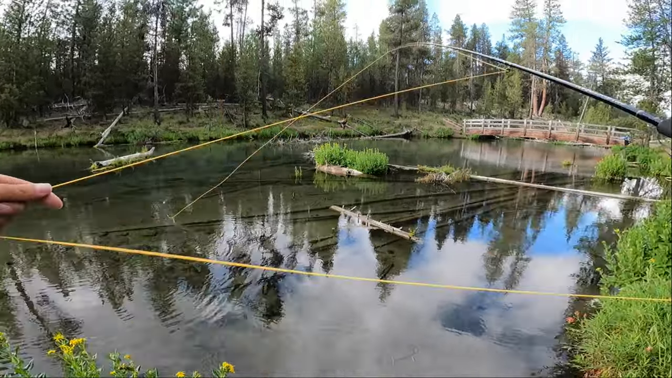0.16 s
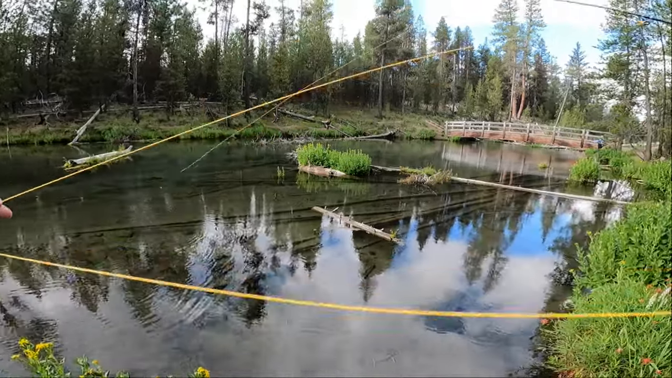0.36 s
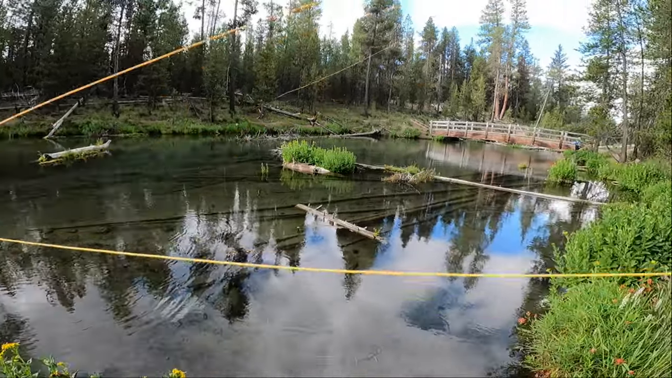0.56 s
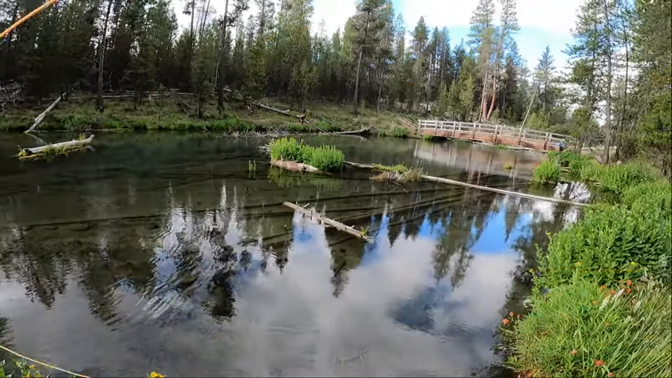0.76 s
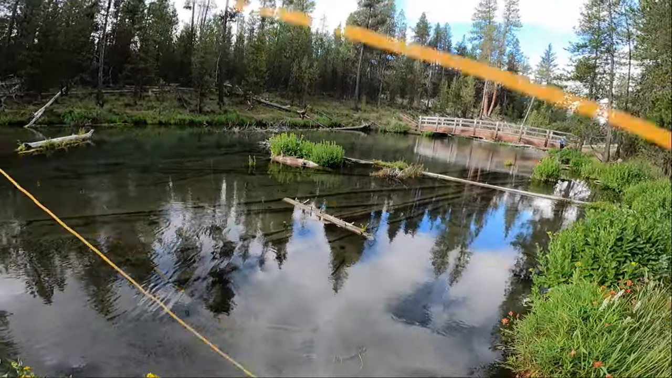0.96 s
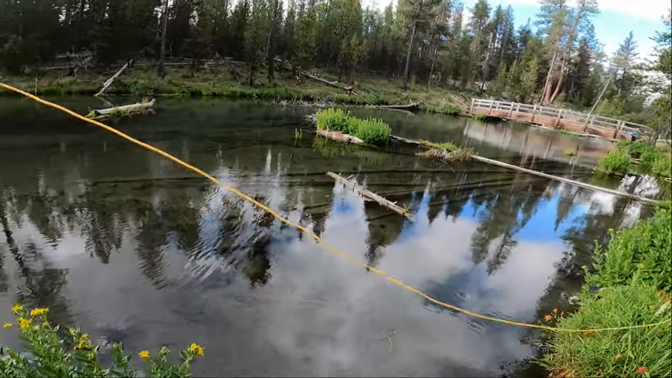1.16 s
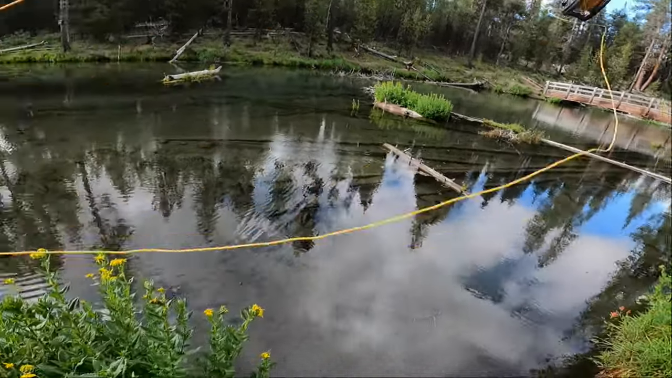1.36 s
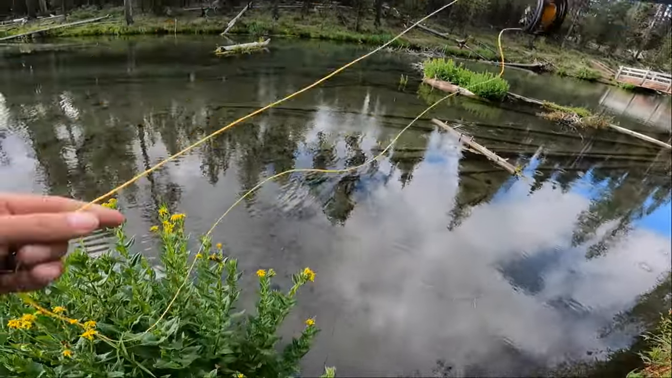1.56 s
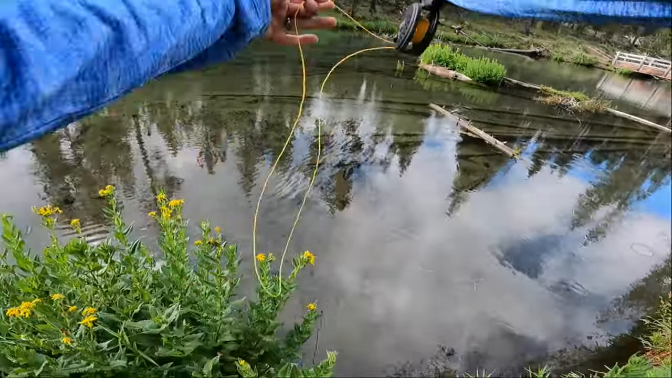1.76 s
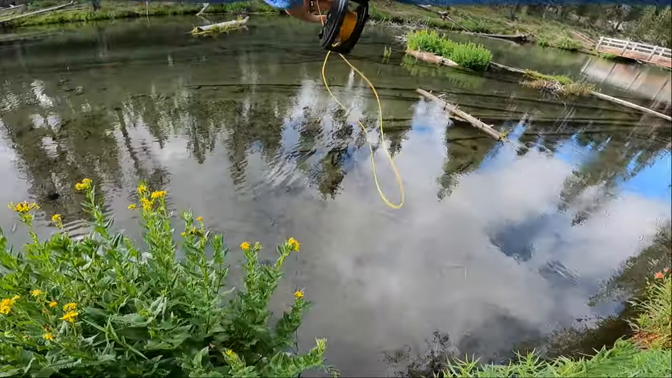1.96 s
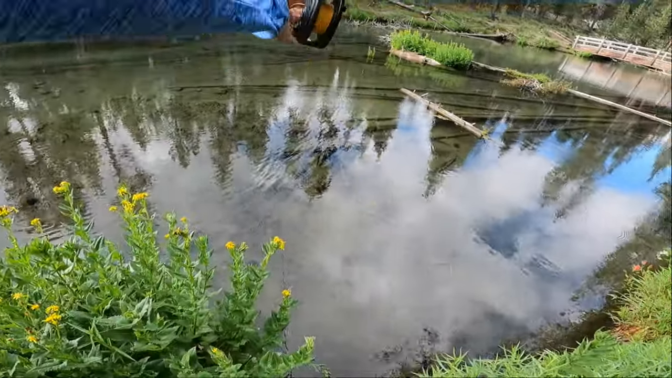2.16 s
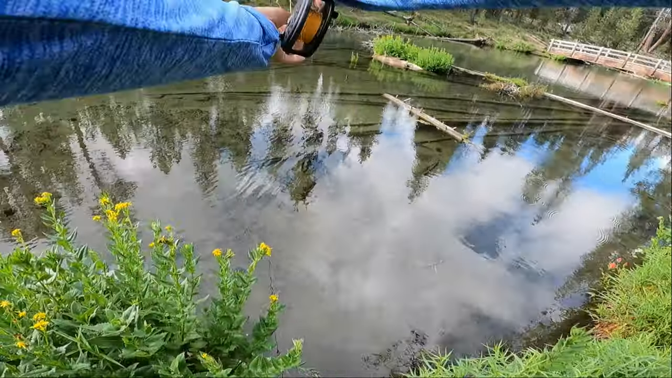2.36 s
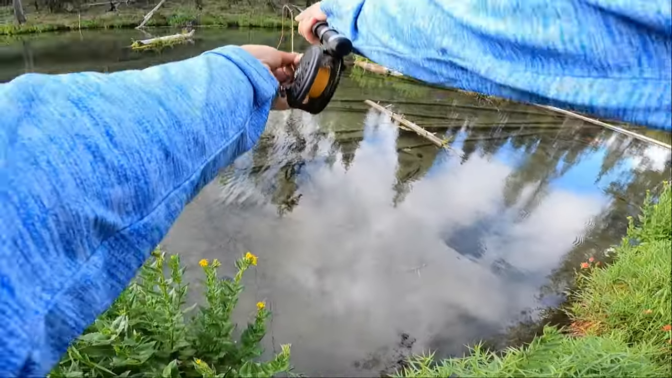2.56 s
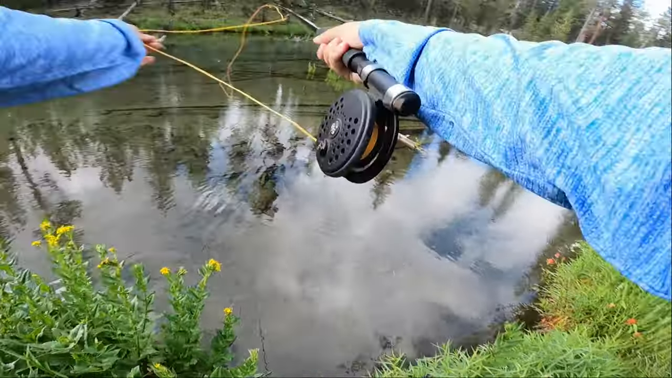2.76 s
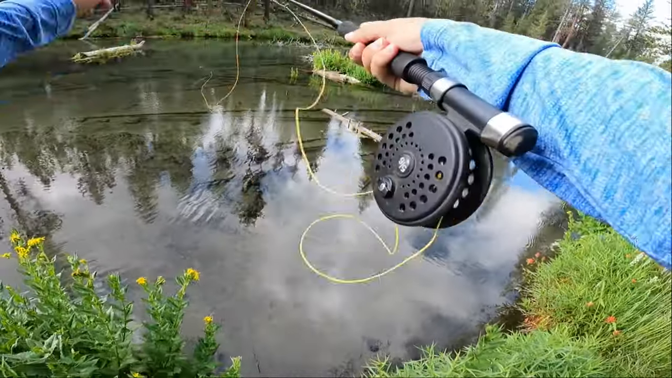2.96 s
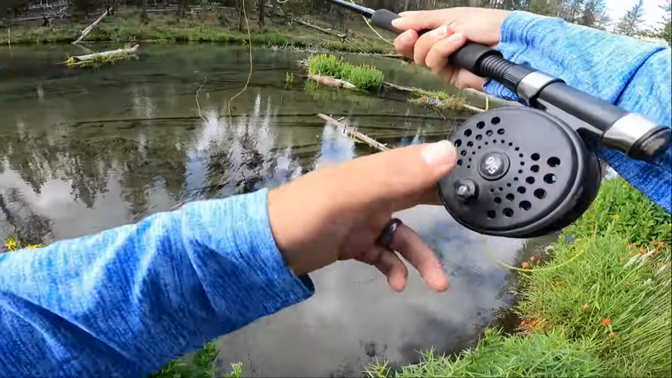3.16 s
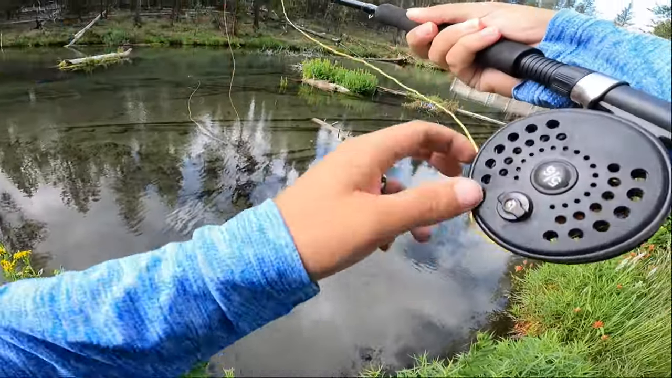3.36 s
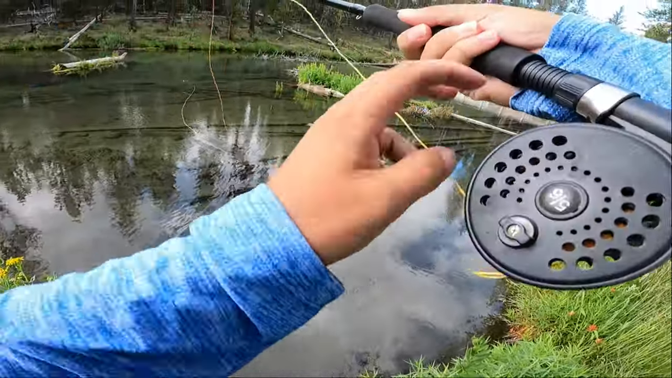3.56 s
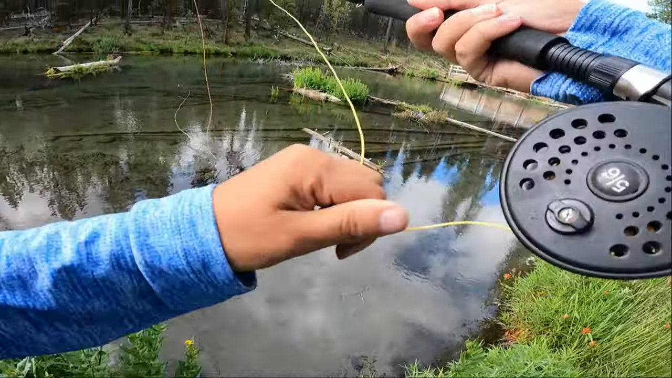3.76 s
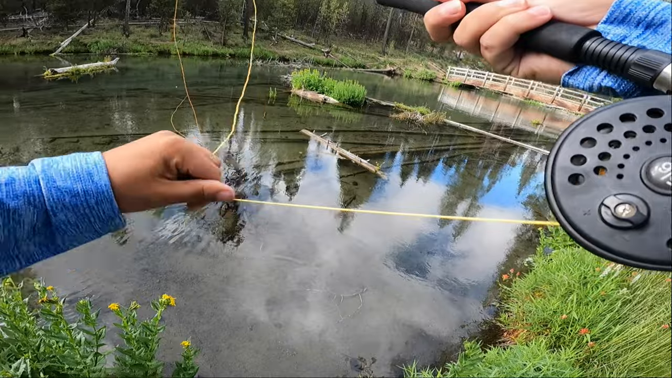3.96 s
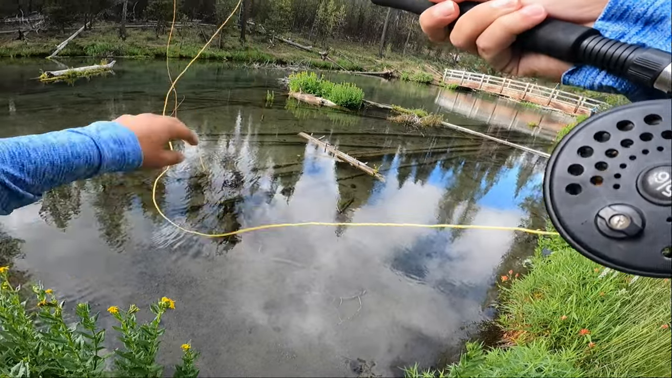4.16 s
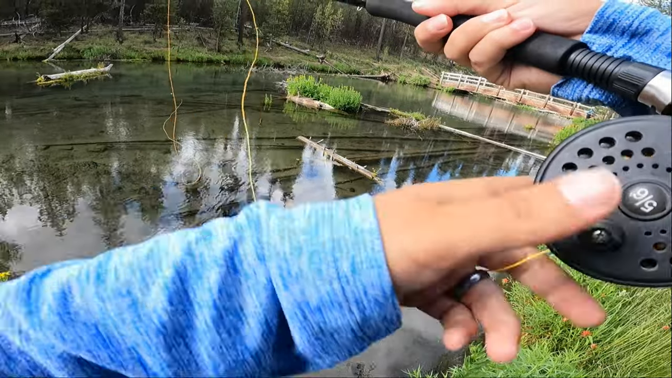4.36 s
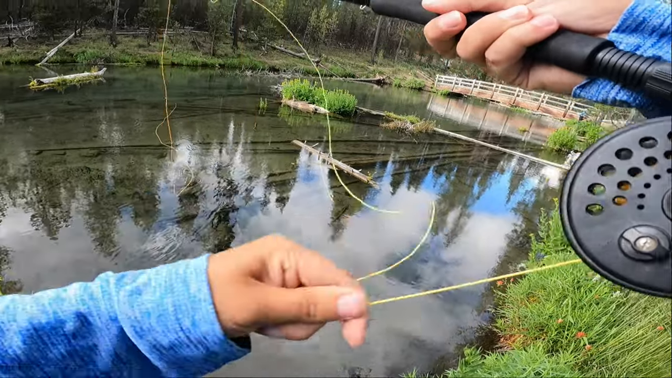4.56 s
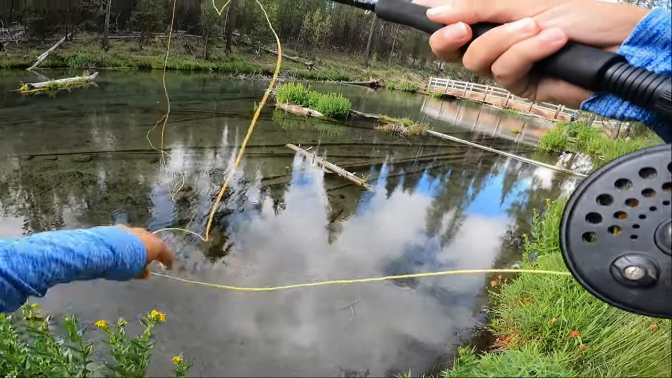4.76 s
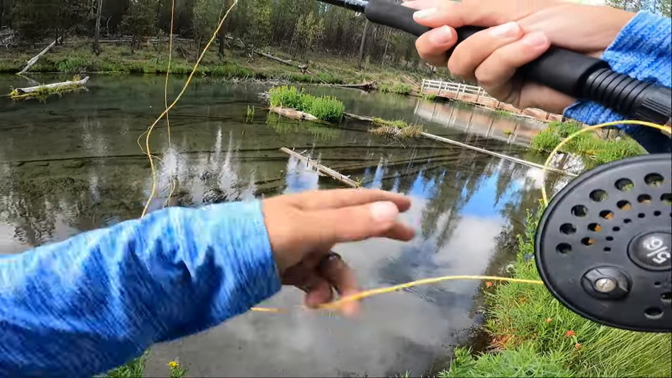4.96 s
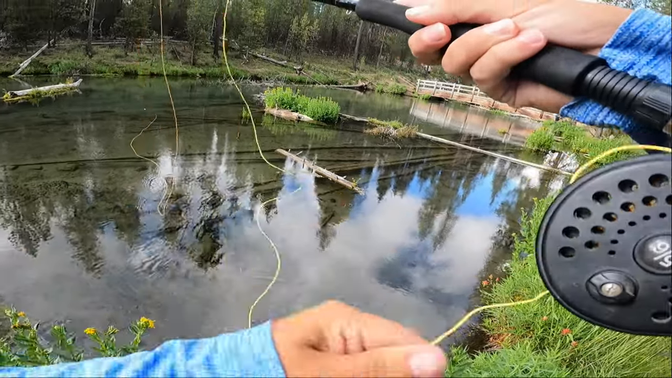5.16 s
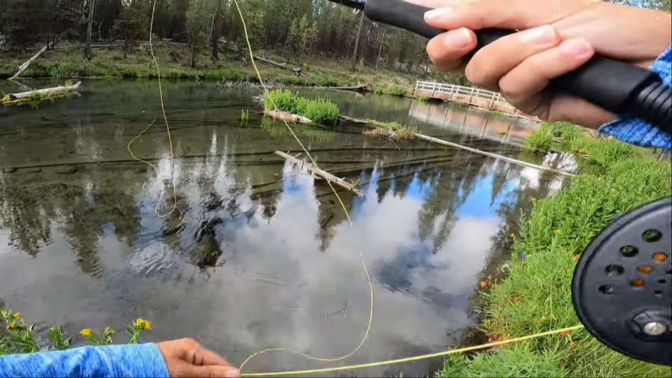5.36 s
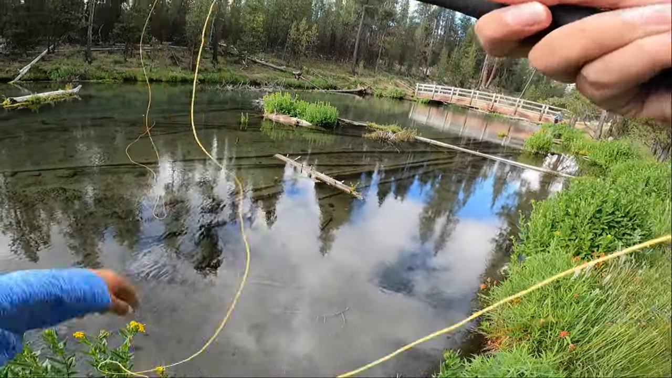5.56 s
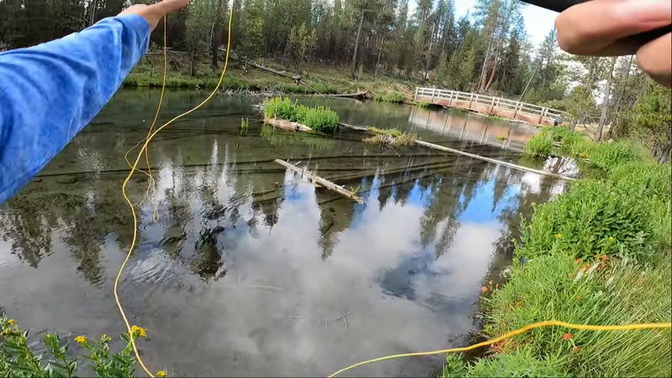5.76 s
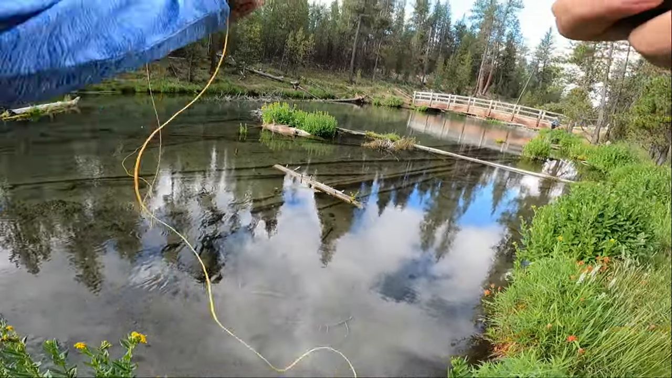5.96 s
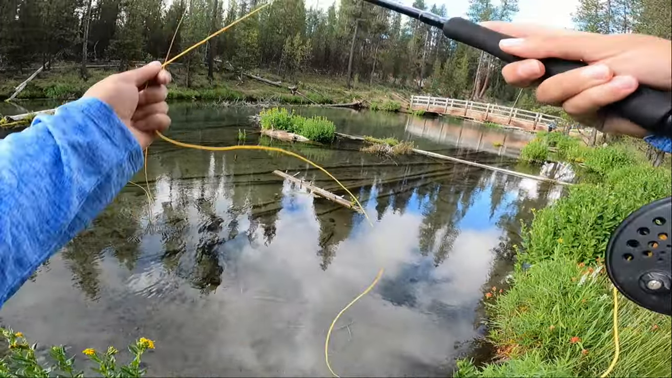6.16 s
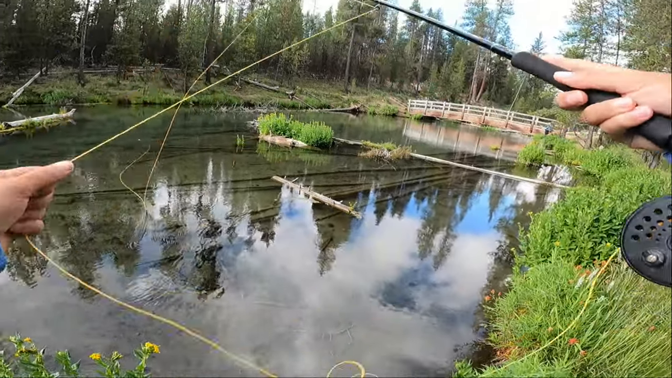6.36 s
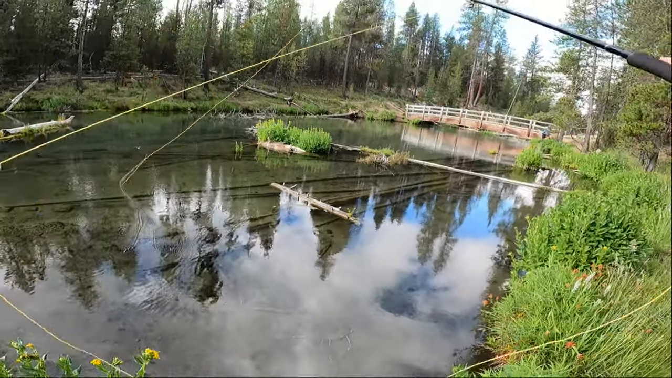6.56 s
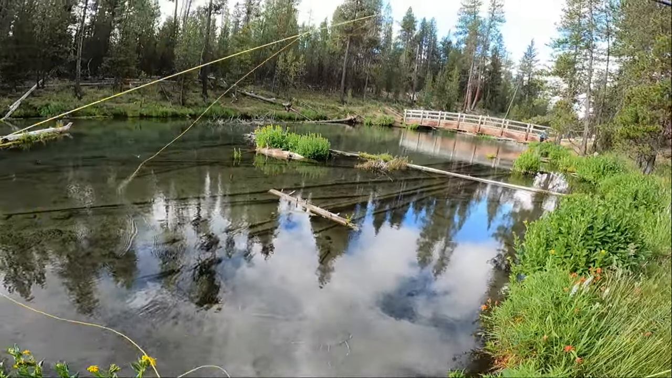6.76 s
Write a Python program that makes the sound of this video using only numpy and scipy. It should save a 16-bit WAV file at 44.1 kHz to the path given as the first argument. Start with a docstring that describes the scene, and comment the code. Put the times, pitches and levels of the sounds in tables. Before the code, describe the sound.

Outdoors on a stream bank, soft water murmur and line hiss open the scene. A muted ratchet buzz comes first, then sliding line and two sharp ticks, then four crisp metallic reel zips, the last three close together. One tiny falling whoop hides in the fourth zip. A stronger airy hiss of line ends it. The microphone is near the reel at arm's length, dry, nearly mono at first and wider later.

```python
"""A click-and-pawl fly reel gives line in five tugs, on the bank of a slow stream.
Each tug spins the spool up until the pawl's clicks merge into a buzz, then it coasts down to single clicks;
every click rings damped modes of the pawl, frame, spring, tooth edges and spool.
Around the tugs the line hisses through the rod guides and scrapes through the fingers, as shaped noise;
knocks and one falling whoop stand out, noise bands make the stream's murmur, and wind bumps the microphone."""
import sys
import numpy as np
from scipy import signal
from scipy.fft import rfft, irfft, next_fast_len
from scipy.io import wavfile
from scipy.ndimage import map_coordinates

SR = 44100
rng = np.random.default_rng(int(sys.argv[2]) if len(sys.argv) > 2 else 0)


def generate_wav(signal):
    """Clip the signal to [-1, 1] and save it as 16-bit WAV at the path in sys.argv[1]."""
    frames = np.transpose(np.atleast_2d(signal))
    scaled = np.clip(frames, -1, 1) * 32767
    pcm = np.round(scaled).astype(np.int16)
    wavfile.write(sys.argv[1], SR, pcm)


N = 300585
TIME = np.arange(N) / SR

# Tugs on the line. Each row: first click in seconds, last click in seconds, spool speed at the first click,
# after the jerk and at its top in teeth per second, relative level of pawl, frame, spring and tooth edge in dB,
# tilt of pawl and tooth edge in dB, then the change over the tug as the reel turns in the hand:
# of the whole click, pawl, spring and tilt in dB.
TUGS = [ (0.421, 1.0158, 87.3, 125.4, 588.7, -22, -28.5, -22, -22.5, 1, 6, -5, 3, -1, -28.5),
        (2.8324, 3.3721, 116.9, 359, 408.3, -4.5, -17.5, -10.5, -11, -3.5, -4.5, 0, -10, -1, -6),
        (4.019, 4.5347, 48.32, 290.2, 500.8, -4, -16, -10.5, -11.5, 4.5, 5, -0.5, 2.5, -3, -9),
        (4.6888, 5.2384, 128, 210.4, 632.5, -2.5, -16.5, -16.5, -14.3, 3.5, -4, -1, 3.5, -1.5, -5.5),
        (5.47, 5.8798, 138.6, 407.3, 511.3, -2.5, -15, -9.5, -14.5, 1, -0.5, 0.5, -1.5, 13.5, -6.5)]


def from_db(db):
    """Decibels to gain."""
    return 10 ** (np.asarray(db) / 20)


def rms_one(x):
    """Scale to an rms of 1."""
    return x / np.sqrt(np.mean(x ** 2) + 1e-20)


def read(rows, at):
    """Every column of a curve at the given times."""
    s, *columns = np.transpose(rows)
    return [np.interp(at, s, c) for c in columns]


def at_hz(points, hz):
    """A spectrum table read on a log-frequency axis."""
    f, value = np.transpose(points)
    return np.interp(np.log(hz), np.log(f), value)


def panned(pan_db):
    """Left and right gains for a level difference; positive favours the left."""
    return from_db(np.array([[.5], [-.5]]) * pan_db)


def drift(rate_hz):
    """Slow random wander with an rms of 1: noise through two equal low-pass poles."""
    step = 40   # computed once every 40 samples, then interpolated
    settle = 2000
    r = np.exp(-2 * np.pi * rate_hz * step / SR)
    white = rng.standard_normal(N // step + settle + 2)
    slow = rms_one(signal.lfilter([1], [1, -2 * r, r * r], white)[settle:])
    return np.interp(np.arange(N) / step, np.arange(len(slow)), slow)


def resonance(x, hz, width_hz):
    """Two-pole resonance with a gain of 1 on top."""
    r = np.exp(-np.pi * width_hz / SR)
    feed = np.array([1, 0, -1]) * (1 - r * r) / 2
    return signal.lfilter(feed, [1, -2 * r * np.cos(2 * np.pi * hz / SR), r * r], x + 1e-18)


def band(x, low_hz, high_hz, order=2):
    """Butterworth band-pass."""
    return signal.sosfilt(signal.butter(order, [low_hz, high_hz], "band", fs=SR, output="sos"), x + 1e-18)


def strikes(times, sizes):
    """Impulses of the given sizes at the given times."""
    out = np.zeros(N)
    np.add.at(out, np.clip(np.round(np.asarray(times) * SR).astype(int), 0, N - 1), sizes)
    return out


def fading(hits, t60):
    """Each impulse becomes a dying envelope of the same energy, 60 dB down after t60 seconds."""
    r = from_db(-60 / (t60 * SR))
    return signal.lfilter([np.sqrt(1 - r * r)], [1, -r], hits + 1e-18)


def swell(start, length, attack_s, release_s):
    """A gain that rises from the start, holds, and dies by 20 dB per release time after the length."""
    rise = np.clip((TIME - start) / attack_s, 0, 1)
    return rise * 10 ** (-np.maximum(TIME - start - length, 0) / release_s)


def noise(colour, grain_db, grain_rate, apart_db):
    """Coloured stereo noise of rms 1, partly shared by the sides, with a level that wanders."""
    # Sound that differs between the two microphone ports.
    # Each row: frequency in Hz, level in dB against the shared sound before apart_db is added.
    ports_apart = [(200, -13), (500, -9.5), (1100, -1.5), (10000, -7.5)]
    size = next_fast_len(N)
    hz = np.maximum(np.arange(size // 2 + 1) * SR / size, 1)
    shared = rfft(rng.standard_normal(N), size)
    separate = rfft(rng.standard_normal((2, N)), size)
    white = shared + from_db(at_hz(ports_apart, hz) + apart_db) * separate
    # 12 dB per octave down beyond either end of the colour
    ends = (np.minimum(hz / colour[0][0], 1) * np.minimum(colour[-1][0] / hz, 1)) ** 2
    coloured = irfft(white * from_db(at_hz(colour, hz)) * ends, size)[:, :N]
    return rms_one(coloured * from_db(grain_db * drift(grain_rate)))


def breeze():
    """Gain of the wind on the microphone: gusts over calm air, summed as power."""
    # Gusts on the microphone. Each row: start in seconds, length in seconds, level in dB.
    gust_rows = [(.12, .48, -48), (1.47, 0.22, -63), (1.74, 0.3, -46), (2.22, 1.08, -52),
                 (2.62, 0.064, -43), (2.9, 0.13, -43.5), (4.87, 0.087, -55), (5.09, 0.045, -51)]
    calm_db = -69.5
    gusts = [from_db(db) * swell(start, length, attack_s=.04, release_s=.12) for start, length, db in gust_rows]
    return np.hypot(from_db(calm_db), np.linalg.norm(gusts, axis=0))


def outdoors():
    """The stream's low murmur and lighter wash, and lumps of wind that differ at each port."""
    # The stream's course. Each row: time in seconds, relative level of murmur in dB, of wash in dB.
    stream = [(0.1, -48, -54.5), (0.75, -50.5, -54), (1.3, -52, -58.5), (1.55, -48, -55),
              (2.25, -49, -59.5), (2.8, -49, -57.5), (3.5, -53.5, -59), (5.2, -53, -58), (5.95, -55, -61.5),
              (6.6, -53, -58)]
    # Spectra of murmur, wash and wind. Each row: frequency in Hz, relative level per Hz in dB.
    murmur_colour = [(70, -32), (120, -11), (170, 0), (230, -0.5), (330, -2.5), (460, -2), (620, -3),
                     (760, -17.5), (1200, -33)]
    wash_colour = [(520, -7), (720, 3), (1000, 1), (1350, -4.5), (1750, -6), (3200, -13), (5000, -24.5),
                   (8000, -28.5), (14000, -41)]
    breeze_colour = [(22, 2), (45, 1.5), (70, -7.5), (110, -12), (200, -25)]
    murmur_db, wash_db = read(stream, TIME)
    murmur = from_db(murmur_db + 0.23) * noise(murmur_colour, grain_db=0.9, grain_rate=18, apart_db=2.5)
    wash = from_db(wash_db + 1.5) * noise(wash_colour, grain_db=1.3, grain_rate=14, apart_db=2.0)
    wind = breeze() * noise(breeze_colour, grain_db=3.5, grain_rate=12, apart_db=5.0)
    return murmur * panned(1.43) + wash * panned(.9) + wind * panned(-1.7)


def line_slide():
    """The line hisses through the guides, each slide at its own pitch, and scrapes unevenly through the fingers."""
    # Slides of the line. Each row: start in seconds, length in seconds, hiss in the guides in dB,
    # scrape through the fingers in dB, change over the slide in dB, pitch of the hiss as a ratio.
    slides = [(0, .42, -63, -85, 5.5, 0.99), (.43, 0.53, -68, -48.5, -8, 1.0),
              (1.4, 0.64, -76, -86, 19, 0.96), (1.73, 0.3, -57, -63.5, -1, 1.14),
              (2.05, 0.47, -60, -54.5, -7, 1.2), (3.38, .37, -61, -62.5, 0, 0.88),
              (4.0, 0.56, -56.5, -66, 1, 1.0), (4.701, 0.92, -64.5, -59.5, -5, 0.97),
              (6.27, 0.58, -47.5, -59.5, -7.5, 1.026)]
    # Spectra of hiss (before its pitch ratio) and scrape. Each row: frequency in Hz, relative level per Hz in dB.
    hiss_colour = [(1500, -19), (2300, -14.5), (3750, -8), (4250, 1.5), (4700, -3), (5100, 0.5),
                   (6200, -11), (8500, -30.5)]
    scrape_colour = [(2000, -4), (4200, -5.5), (5500, -3.5), (7400, -9), (8500, -17), (10000, -17),
                     (13000, -27), (15000, -37)]
    slack_hiss_db, slack_scrape_db = -71, -72.5   # the slack line never lies quite still
    hiss = from_db(slack_hiss_db) * noise(hiss_colour, grain_db=0.5, grain_rate=32, apart_db=1.5)
    scrape_gain = from_db(slack_scrape_db)
    for start, length, hiss_db, scrape_db, change_db, pitch in slides:
        change = from_db(change_db * np.clip((TIME - start) / length, 0, 1))
        gain = swell(start, length, attack_s=0.026, release_s=0.083) * change
        pitched = np.array(hiss_colour) * [pitch, 1]
        hiss = hiss + gain * from_db(hiss_db) * noise(pitched, grain_db=1.4, grain_rate=27, apart_db=3.0)
        scrape_gain = np.hypot(scrape_gain, gain * from_db(scrape_db))
    return hiss + scrape_gain * noise(scrape_colour, grain_db=2.0, grain_rate=32, apart_db=2.0)


def whoop(overtone_db):
    """Air sheds off a loop of slack line swinging past: a falling tone and its octave under an arch."""
    start_s, length_s, level_db = 4.815, 0.0635, -34.5
    from_hz, to_hz = 440, 207
    passed = np.clip((TIME - start_s) / length_s, 0, 1)
    phase = 2 * np.pi * np.cumsum(from_hz * (to_hz / from_hz) ** passed) / SR
    arch = 2 * np.sqrt(passed * (1 - passed))
    return from_db(level_db) * arch * (np.sin(phase) + from_db(overtone_db) * np.sin(2 * phase))


def knocks(t60, width_hz, body_db, treble_db):
    """Each knock is a short rattle that rings mainly one resonance of the reel."""
    # Lone knocks of line and fingers on the reel. Each row: start in seconds, peak in dB,
    # centre in Hz, treble in dB before treble_db is added.
    knock_rows = [(0.0845, -33.5, 3300, -32), (0.122, -58, 3400, -35), (0.143, -40, 3400, -30),
                  (2.428, -20.5, 6000, 1.5), (2.4611, -22.5, 8500, -13), (2.568, -36.5, 2360, -30),
                  (3.4471, -30.5, 3050, -22), (3.8436, -39, 2580, -36.5), (4.6123, -15.5, 6640, -19),
                  (4.6472, -17.5, 6160, 0)]
    out = 0
    for s, peak_db, hz, bright_db in knock_rows:
        grit = rng.standard_normal(N) + 0.46 * rng.standard_normal((2, N))
        rattle = fading(strikes([s], [1]), t60) * grit
        knock = resonance(resonance(rattle, hz, width_hz), hz, width_hz)
        knock += from_db(body_db) * band(rattle, 2770, 6700)
        knock += from_db(treble_db + bright_db) * band(rattle, 8350, 10600)
        out = out + from_db(peak_db) * knock / np.abs(knock).max()
    return out


def spool_speed(t, length, first, jerked, top):
    """Teeth per second: the hand jerks the spool, draws ever faster, then lets it coast against the pawl."""
    jerk_s = .04   # the hand takes up the line this quickly
    drag = 1880   # teeth per s per s: the pawl brakes the coasting spool at a steady rate
    last = 20   # teeth per s at the last click
    draw_s = max(length - (top - last) / drag, jerk_s)
    jerk = (jerked - first) * np.minimum(t / jerk_s, 1)
    pulled = first + jerk + (top - jerked) * (t / draw_s) ** 2
    coasting = last + drag * (length - t)
    return np.minimum(pulled, coasting)


def ratchet(jitter_s, uneven_db, skip_speed, skip_db):
    """One click per passing tooth: times and relative sizes."""
    db_per_octave, usual_speed = -0.14, 160   # a faster spool (teeth per s) gives the pawl less time to drop
    clicks = []
    for start, stop, first, jerked, top, *_ in TUGS:
        t = np.arange(0, stop - start, 1 / SR)
        speed = spool_speed(t, stop - start, first, jerked, top)
        teeth = np.cumsum(speed) / SR
        at = np.interp(np.linspace(0, teeth[-1], round(teeth[-1]) + 1), teeth, t)
        speed = np.interp(at, t, speed)
        # at high speed the pawl lands lightly on every other tooth and harder on the next
        flying = np.clip(10 * (speed / skip_speed - 1), 0, 1)
        alternate = (-1) ** np.arange(len(at)) - .5
        level_db = skip_db * flying * alternate
        level_db += uneven_db * rng.standard_normal(len(at))
        level_db += db_per_octave * np.log2(speed / usual_speed)
        jittered = start + at + jitter_s * rng.standard_normal(len(at))
        clicks.append([jittered, from_db(level_db)])
    return np.hstack(clicks)


def click_colour(at):
    """Levels of the four parts and the two tilts in dB; each drifts over a tug and bends in its middle."""
    # Bend of the colour in mid-tug, with the line taut, against the ends of the tug.
    # One row: pawl, frame, spring, tooth edge, pawl tilt, tooth edge tilt, all in dB.
    mid_tug_db = (0.6, -0.7, 0.5, -0.1, -1.5, 2.5)
    edge_tilt_share = .4   # the tooth edges follow this share of the pawl's change of tilt
    bend = np.array(mid_tug_db) / 2
    points = []
    for start, stop, _, _, _, *usual, whole, pawl, spring, tilt in TUGS:
        change = np.array([whole + pawl, whole, whole + spring, whole, tilt, edge_tilt_share * tilt])
        points.append((start, *(usual - change / 2 - bend)))
        points.append(((start + stop) / 2, *(usual + bend)))
        points.append((stop, *(usual + change / 2 - bend)))
    return read(points, at)


def reel_part(modes, at, sizes, tilt_db, chatter, chatter_s, scatter, skirt, wander_db=2.0):
    """The pawl snaps onto a tooth and chatters briefly; each mode gets its own share of the blow."""
    hits = strikes(at, sizes)
    t = TIME[:SR // 100] / chatter_s
    burst = t * np.exp(-t)   # the chatter swells and dies within a few milliseconds
    contact = signal.oaconvolve(hits, burst / np.linalg.norm(burst))[:N]
    # a faint noise swells up just before each click: a fade run backwards
    contact = contact + from_db(-20) * fading(hits[::-1], t60=0.024)[::-1]
    out = 0
    for k, (hz, width_hz, level_db, pan_db) in enumerate(modes):
        rattle = chatter * rng.standard_normal(N) + scatter * rng.standard_normal((2, N))
        # tilt favours the upper or the lower modes, and the level of each wanders
        lean_db = tilt_db * np.clip(2 * k / (len(modes) - 1) - 1, -.5, .5) + wander_db * drift(11)
        blow = hits * (-1) ** k + contact * rattle   # neighbouring modes start in opposite phase
        out = out + from_db(level_db + lean_db) * panned(pan_db) * resonance(blow, hz, width_hz)
    # a part radiates little outside the range of its modes
    out = band(out, modes[0][0] / (1 + skirt), modes[-1][0] * (1 + skirt), order=3)
    return rms_one(out) * np.sqrt(np.mean(hits ** 2))


def reel():
    """The clicks ring the pawl, frame, spring and tooth edges, and faintly the spool."""
    # Damped modes of the reel's parts. Each row: frequency in Hz, width in Hz, relative level in dB,
    # left over right in dB.
    pawl_modes = [(4970, 330, -8.5, 0.5), (5730, 680, -4, -4), (6320, 360, 0.5, -3), (6760, 320, 1.5, -6),
                  (7230, 562, -5, 4.5)]
    frame_modes = [(859, 500, -15, 4.5), (1690, 290, -15, -2), (2224, 190, -8.5, -0.5),
                   (2856, 480, -5.5, -1.5), (3480, 100, -5, -3.5), (4055, 250, 1, -4), (4676, 720, 0, -2)]
    spring_modes = [(8766, 430, -0.3, 0), (9090, 500, -0.7, 0.012)]
    edge_modes = [(10370, 530, 2.5, 1), (11550, 500, 4.5, 1.5), (12500, 530, 2.5, -1.5),
                  (13560, 700, -7.5, -9), (14940, 600, -21.5, -15)]
    # The spool's plates ring on after each click. Each row: frequency in Hz, width in Hz, relative level in dB.
    spool_modes = [(3060, 60, -7), (5000, 30, -9.5), (9000, 44, -12.5)]
    # Where the reel is held. Each row: time in seconds, left over right in dB.
    reel_side = [(1, 0.5), (3, 0.7), (4.1, 0), (5.8, -0.1)]
    at, size = ratchet(jitter_s=.00005, uneven_db=0.78, skip_speed=470, skip_db=1.5)
    pawl, frame, spring, edge = size * from_db(click_colour(at)[:4])
    pawl_tilt, edge_tilt = click_colour(TIME)[4:]
    out = from_db(-0.65) * reel_part(pawl_modes, at, pawl, pawl_tilt,
                                     chatter=0.68, chatter_s=0.00042, scatter=0.11, skirt=0.1)
    out += reel_part(frame_modes, at, frame, 0,
                     chatter=0.93, chatter_s=0.00088, scatter=0.55, skirt=0.14)
    out += from_db(1.65) * reel_part(spring_modes, at, spring, 0,
                                     chatter=0.53, chatter_s=0.00069, scatter=0.26, skirt=0.28)
    out += from_db(-0.4) * reel_part(edge_modes, at, edge, edge_tilt,
                                     chatter=0.99, chatter_s=0.00081, scatter=0.76, skirt=.07)
    for hz, width_hz, level_db in spool_modes:
        hits = strikes(at, pawl * rng.standard_normal(len(at)))
        out += from_db(level_db) * resonance(hits, hz, width_hz)
    return out * panned(read(reel_side, TIME)[0])


def reach_ports(x, lag_s):
    """Close sounds reach the right port a moment after the left: a phase turn delays the right."""
    size = next_fast_len(N)
    turn = np.exp(-2j * np.pi * np.arange(size // 2 + 1) * SR / size * lag_s)
    return np.array([x[0], irfft(rfft(x[1], size) * turn, size)[:N]])


def bank_echo(x, t60, dull_hz):
    """Arms, grass and water scatter a thin, short tail, different on each side."""
    t = TIME[:SR // 4]
    tail = rng.standard_normal((2, len(t))) * from_db(-60 * t / t60)
    tail = tail * (t > .002)   # the first scatter comes after 2 ms
    tail = signal.sosfilt(signal.butter(1, dull_hz, fs=SR, output="sos"), tail)
    return signal.fftconvolve(x, tail / np.sqrt(np.sum(tail ** 2) / 2), axes=1)[:, :N]


def arm_echo(x, delay_s, sway_s, sway_rate):
    """A reflection off the moving arm sweeps shallow notches through the buzz."""
    heard_at = TIME - np.abs(delay_s + sway_s * drift(sway_rate))
    return np.array([map_coordinates(side, [heard_at * SR], order=3) for side in x])


def scene():
    """The reel at arm's length, with the line and the stream around it."""
    close = reel() + knocks(t60=0.0029, width_hz=750, body_db=-14.5, treble_db=-8.5)
    close = reach_ports(close, lag_s=.000007)
    echoes = from_db(-14.5) * bank_echo(close, t60=0.047, dull_hz=7040)
    echoes += from_db(-14) * arm_echo(close, delay_s=.0016, sway_s=.0003, sway_rate=1.2)
    return close + echoes + whoop(overtone_db=-13.5) + line_slide() + outdoors()


def record(dry):
    """The image starts nearly mono, widens a little, narrows near 1.2 s, then opens out; the top is cut steeply."""
    # Width of the stereo image. Each row: time in seconds, level of the side signal in dB.
    width = [(.3, -37), (.39, -19), (1.05, -13), (1.17, -29), (1.45, -13.5), (2.1, -5.5), (2.9, -1)]
    cutoff_hz = 15700
    mid = dry.mean(axis=0)
    narrowed = mid + from_db(read(width, TIME)[0]) * (dry - mid)
    return signal.sosfilt(signal.ellip(10, .1, 80, cutoff_hz, fs=SR, output="sos"), narrowed)


dry = scene()
out = record(dry)
generate_wav(out)
```